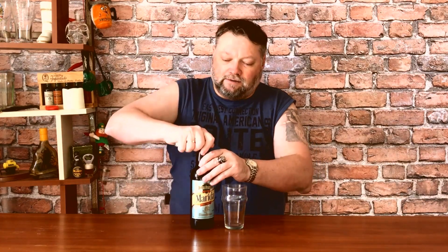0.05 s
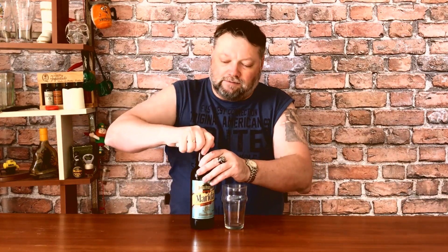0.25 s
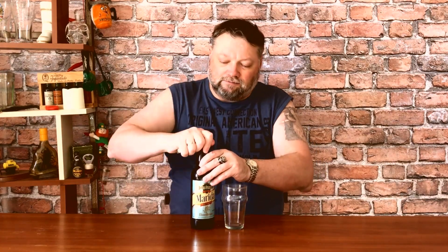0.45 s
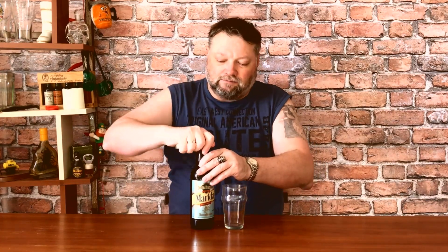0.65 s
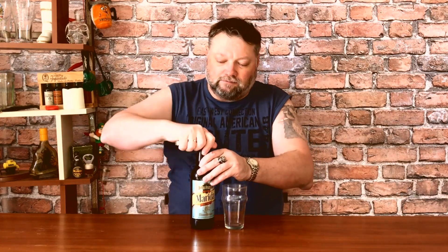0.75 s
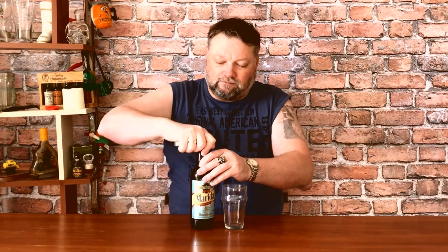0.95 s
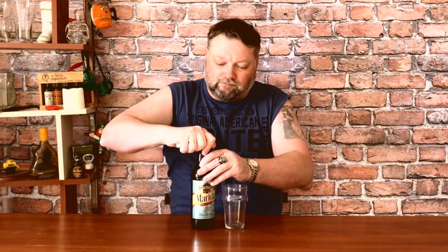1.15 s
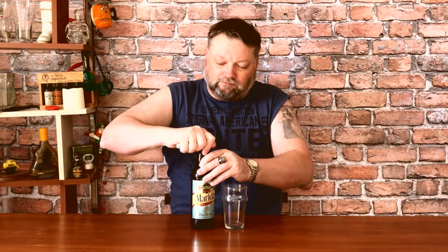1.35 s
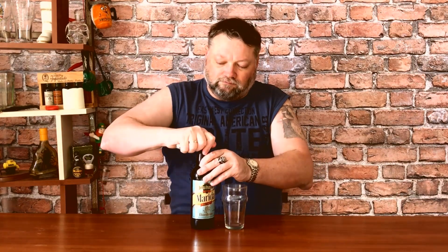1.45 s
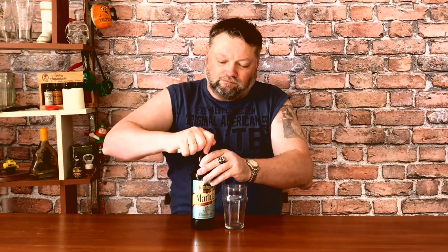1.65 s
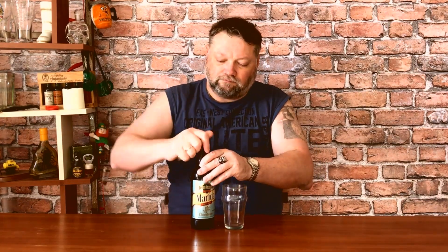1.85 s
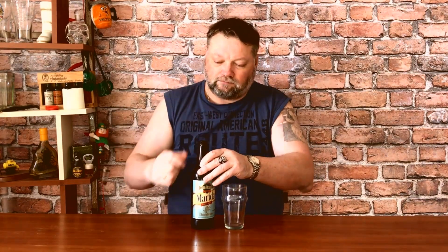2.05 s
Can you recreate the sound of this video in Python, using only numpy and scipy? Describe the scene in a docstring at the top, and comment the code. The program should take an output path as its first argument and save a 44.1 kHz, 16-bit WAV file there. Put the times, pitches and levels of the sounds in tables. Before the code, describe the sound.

A glass bottle is opened with a brief hiss, a sharp pop and small clinks.

```python
"""Opening a glass bottle

A crown cap is levered off a bottle on a wooden table, in a quiet, hard-walled room. Gas jets hissing
under the rim, the seal pops and overloads the microphone, the hand shifts, and the opener knocks.
A last puff escapes, the bottle bumps and judders, and the cap ticks, scrapes free and chimes.
Each impact is a filtered pulse of force; bottle, cap and table ring on in their damped modes."""
import sys
import numpy as np
from scipy import signal
from scipy.fft import rfft, irfft
from scipy.io import wavfile
from scipy.ndimage import uniform_filter1d

SR = 44100
rng = np.random.default_rng(int(sys.argv[2]) if len(sys.argv) > 2 else 0)


def inscribe(sig):
    """Save sig as 16-bit PCM at rate SR to the path in sys.argv[1].

    A 1-D sig is mono; a 2-D sig holds one channel per row.
    Samples are clipped to [-1, 1] before scaling.
    """
    pcm = np.round(np.clip(np.atleast_2d(sig).T, -1, 1) * 32767)
    wavfile.write(sys.argv[1], SR, pcm.astype(np.int16))


N = 92610


def amp(db):
    """Amplitude ratio of a level in decibels."""
    return 10 ** (np.asarray(db) / 20)


def unit(x):
    """Normalisation to an rms of 1."""
    return x / np.sqrt(np.mean(x ** 2) + 1e-20)


def read(table, hz, column=1):
    """Interpolation of a table on a logarithmic frequency axis."""
    table = np.array(table)
    return np.interp(np.log(hz + 1), np.log(table[:, 0] + 1), table[:, column])


def add(mix, start_s, sound):
    """Superposition of a delayed sound on the mix."""
    part = mix[round(start_s * SR):][:len(sound)]
    part += sound[:len(part)]


def flatten(x, bins):
    """Whitening: the spectrum is divided by its local rms."""
    z = rfft(x)
    return irfft(z / np.sqrt(abs(uniform_filter1d(abs(z) ** 2, bins)) + 1e-12), len(x))


def noise(spectrum):
    """Stationary filtered noise of rms 1."""
    gain = amp(read(spectrum, np.fft.rfftfreq(N, 1 / SR)))
    return unit(irfft(rfft(rng.standard_normal(N)) * gain, N))


def flutter(depth_db, samples):
    """Random amplitude modulation: a gain whose level follows smoothed noise."""
    return amp(depth_db * unit(uniform_filter1d(rng.standard_normal(N), samples)))


def click(spectrum, size=8192):
    """Minimum-phase pulse of unit energy with the given spectrum."""
    level_db = np.maximum(read(spectrum, abs(np.fft.fftfreq(size, 1 / SR))), -90)
    log_response = np.conj(signal.hilbert(np.log(amp(level_db))))
    pulse = np.fft.ifft(np.exp(log_response)).real[:size // 2]
    return pulse / np.linalg.norm(pulse)


def impacts(events, spectrum, clean_contact_s=0.003, size=4096):
    """Convolution of force and click: short contacts stay clean, long ones break into a dying scatter."""
    pulse, out = click(spectrum), np.zeros(N)
    for start, db, contact_s in events:
        scatter = rng.standard_normal(size) * np.exp(-np.arange(size) / SR / contact_s)
        scatter = flatten(scatter, bins=12)[:size // 2]
        share = contact_s ** 2 / (contact_s ** 2 + clean_contact_s ** 2)
        force = np.sqrt(share) * scatter / np.linalg.norm(scatter)
        force[0] += np.sqrt(1 - share)
        add(out, start, amp(db) * signal.fftconvolve(force, pulse))
    return out


def ring(events, modes, rise_s, diffuse=0.62, waver_s=0.035):
    """Free vibration: each event starts damped modes, which waver as the room scatters them."""
    t, out = np.arange(SR) / SR, np.zeros(N)
    window = np.hanning(round(2 * waver_s * SR))
    for start, db, *_ in events:
        for hz, mode_db, t60 in modes:
            white = rng.standard_normal(SR) + 1j * rng.standard_normal(SR)
            drift = signal.fftconvolve(white, window, "same")
            waver = np.sqrt(1 - diffuse ** 2) + diffuse * drift / drift.std()
            tone = (waver * np.exp(2j * np.pi * (hz * t + rng.random()))).real
            envelope = (1 - np.exp(-t / rise_s)) * np.exp(-np.log(1000) * t / t60)
            add(out, start, amp(db + mode_db) * envelope * tone)
    return out


def gap_whistles(flutter_s=0.014):
    """Narrow-band noise: thin whistles of the gap under the cap flare and fade independently."""
    # whistle bands (f/Hz, width/Hz, level re jet/dB)
    bands = [(8300, 120, -12), (8750, 250, -11), (9600, 160, -14)]
    hz, out = np.fft.rfftfreq(N, 1 / SR), np.zeros(N)
    for centre, width, db in bands:
        band = irfft(rfft(rng.standard_normal(N)) * np.exp(-((hz - centre) / width) ** 2), N)
        out += amp(db) * unit(band * flutter(depth_db=3.5, samples=round(flutter_s * SR)))
    return out


def gas_hiss(split_hz=6000, low_lag_s=0.0055, top_hz=13000):
    """Jet noise: gas escapes under the cap, thin at first, then full as the lower band comes in."""
    # leaks (start t/s, rise/s, held until t/s, release/s, level/dB)
    leaks = [(0.099, 0.048, 0.28, 0.11, -24.5), (1.068, 0.03, 1.132, 0.027, -50)]
    # jet spectrum (f/Hz, level/dB)
    spectrum = [(240, -45), (721, -33.5), (1380, -23.5), (1700, -16.5), (1950, -6), (2600, -9),
                (2960, -1.5), (3700, -8.5), (4220, -6.5), (6200, -5), (7800, -7), (8430, -2.5), (10500, -6),
                (11300, -6.5), (12600, -15), (13500, -28.5)]
    t, out = np.arange(N) / SR, np.zeros(N)
    jet = noise(spectrum) + gap_whistles()
    low = signal.sosfiltfilt(signal.butter(2, split_hz, fs=SR, output="sos"), jet)
    for start, rise, until, release, db in leaks:
        closing = np.clip(1 - (t - until) / release, 0, 1)
        for band, lag in ((jet - low, 0), (low, low_lag_s)):
            opening = np.clip((t - start - lag) / rise, 0, 1)
            out += amp(db) * band * (opening * closing) ** 2
    out *= flutter(depth_db=1.1, samples=250)
    return signal.sosfilt(signal.butter(12, top_hz, fs=SR, output="sos"), out)


def seal_pop():
    """Sudden pressure release excites neck and cap. Returns the pop with an early echo, and ringing."""
    # the seal's crack and gas burst, then an early room echo of the pop
    # (t/s, energy level/dB, duration/s)
    pulses = [(0.3609, 24.5, 0.0024), (0.3632, 20, 0.01), (0.391, 14, .003)]
    # pop spectrum (f/Hz, level/dB)
    spectrum = [(76, -46), (130, -29), (233, -14.5), (315, -18), (380, -9), (650, -30), (830, -18.5),
                (1050, -11.5), (1160, -11.5), (1290, -1.5), (1480, -8), (1900, -6), (2300, -14),
                (2600, -9.5), (2880, -9), (3300, -17), (3550, -13), (4020, -21), (4400, -10), (4700, -17),
                (5200, -16.5), (5730, -9.5), (6150, -21), (9870, -15), (16000, -54.5)]
    # modes of neck and cap (f/Hz, level/dB, T60/s)
    modes = [(1072, -1, .3), (1252, 3.5, .43), (1307, 4.5, .41), (1388, -3, .45), (1631, -3, .4),
             (1846, -7, .45), (2640, -7, .43), (3489, -5, .4), (4462, -5, .34), (4829, -6, .37),
             (5640, -4, .38), (5739, -3.5, .42)]
    crack_s, ring_db = pulses[0][0], -20.5
    return impacts(pulses, spectrum), ring([(crack_s, ring_db)], modes, rise_s=0.00067)


def table_resonance():
    """Structure-borne sound: shoves pass through the bottle into the low modes of the table."""
    # shoves (t/s, level/dB)
    shoves = [(0.367, -33.5), (0.917, -45.5), (1.62, -47)]
    # modes of the table top (f/Hz, level/dB, T60/s)
    modes = [(57, 4, .55), (81, 4, .45), (165, -5, .6), (236, 3, .62), (272, -4, .5), (377, -8, .55)]
    return ring(shoves, modes, rise_s=0.018)


def grip_rub(centre_s=0.765, width_s=0.022, db=-47.5):
    """Friction noise: a soft swell of skin rubbing on glass as the hand shifts."""
    # rubbing spectrum (f/Hz, level/dB)
    spectrum = [(80, -8.5), (370, 4.5), (650, -12.5), (1000, -4), (2300, -8), (4000, -15), (10000, -46.5)]
    swell = np.exp(-((np.arange(N) / SR - centre_s) / width_s) ** 2)
    return amp(db) * noise(spectrum) * swell


def opener_knocks():
    """Impact excitation: the opener strikes the cap on a second pull. Returns knocks and ringing."""
    # knocks (t/s, energy level/dB, contact/s)
    knocks = [(0.9056, -12, 0.0038), (0.9139, 16.5, 0.00078)]
    # knock spectrum (f/Hz, level/dB)
    spectrum = [(65, -70), (110, -30), (228, -11.5), (297, -27.5), (403, -11), (617, -31), (1040, -22),
                (1200, -8), (1390, -9), (1570, -3), (2000, -6), (2710, -5), (3120, -20), (4590, -18.5),
                (5080, -21.5), (7940, -26), (11200, -31.5), (13200, -57.5), (14000, -83)]
    # modes of bottle and cap (f/Hz, level/dB, T60/s)
    modes = [(1251, -5.5, 0.45), (1307, -2, 0.28), (1560, 0.5, 0.4), (1580, -3, 0.42), (2200, -5, 0.37)]
    return impacts(knocks, spectrum), amp(-40.5) * ring(knocks, modes, rise_s=0.0026)


def rim_ticks():
    """Brief contacts have wide spectra: the opener ticks brightly on the rim of the cap."""
    # ticks (t/s, energy level/dB, contact/s)
    ticks = [(1.534, -33.5, 0.00093), (1.7315, -7, 0.00021), (1.7395, -21, 0.0012), (1.775, -12, 0.0013)]
    # tick spectrum (f/Hz, level/dB)
    spectrum = [(200, -22), (1500, -13.5), (2000, 1.5), (2350, -5.5), (3150, -5.5), (3700, 3.5), (4450, 1),
                (4850, -18), (9300, -22), (11000, -38), (15000, -62)]
    return impacts(ticks, spectrum)


def bottle_bumps():
    """Impact on a compliant surface: glass meets wood with a mostly low-pitched thud."""
    # bumps (t/s, energy level/dB, contact/s)
    bumps = [(1.6085, -12, 0.003), (1.614, -7, 0.0061)]
    # bump spectrum (f/Hz, level/dB)
    spectrum = [(65, -28.5), (110, -38), (244, 6), (411, -26), (492, -10), (748, -23), (1050, -15.5),
                (1840, -9.5), (2380, -17), (3150, -13), (5090, -33.5), (9830, -38), (13000, -52)]
    return impacts(bumps, spectrum)


def base_judder(start_s=1.7, length_s=0.18, first_hz=305, last_hz=237, db=-45.5):
    """Contact vibration: the base judders on the wood as it settles, a low groan of falling pitch."""
    progress = np.clip((np.arange(N) / SR - start_s) / length_s, 0, 1)
    cycles = np.cumsum(first_hz + (last_hz - first_hz) * progress) / SR
    envelope = np.sin(np.pi * np.sqrt(progress))
    return amp(db) * envelope * np.sin(2 * np.pi * (cycles + rng.random()))


def cap_scrape():
    """Sliding friction as a run of tiny impacts: the cap drags over the glass and comes free."""
    # scrapes (t/s, energy level/dB, contact/s)
    scrapes = [(1.8098, -2.5, 0.00074), (1.819, -11, 0.0016), (1.84, -13.5, 0.011)]
    # scrape spectrum (f/Hz, level/dB)
    spectrum = [(450, -9.5), (600, -4), (850, -15), (1550, -2), (2100, 1.5), (2300, -11), (2800, 8.5),
                (3300, -4.5), (3650, 7), (4000, -3.5), (6000, -6.5), (9400, -10.5), (14000, -34)]
    return impacts(scrapes, spectrum)


def cap_chime():
    """Inharmonic modes: the loose cap chimes against the opener. Returns clinks and ringing."""
    # clinks (t/s, energy level/dB, contact/s)
    clinks = [(1.8974, -13.5, 0.00091), (2.084, -27.5, 0.0026)]
    # clink spectrum (f/Hz, level/dB)
    spectrum = [(800, -30), (1200, -6), (1900, -8), (2300, 8), (3350, -15), (4600, 1.5), (5300, -12),
                (9500, -15.5), (13000, -48)]
    # modes of the loose cap (f/Hz, level/dB, T60/s)
    modes = [(2309, -3.5, .36), (3812, -7.5, .42), (4748, -4.5, .6), (8400, -13, .3), (8470, -6, .13)]
    return impacts(clinks, spectrum), amp(-34) * ring(clinks, modes, rise_s=0.00092)


def diffuse_noise(size=2048, passes=3):
    """Short-time whitening: one second of noise in which no pitch stands out for long."""
    x = rng.standard_normal(SR)
    for _ in range(passes):
        z = signal.stft(x, nperseg=size)[2]
        local_rms = np.sqrt(uniform_filter1d(abs(z) ** 2, size=5, axis=0))
        x = signal.istft(z / local_rms, nperseg=size)[1][:SR]
    return unit(x)


def room(x, first_echo_s=0.0012, early_db=3, early_s=0.045):
    """Reverberation: direct sound, then dense reflections that die faster in the treble."""
    # reverberant field (f/Hz, T60/s, level re direct sound/dB)
    reverb = [(60, 0.6, 17.5), (238, 0.45, 4.5), (556, 0.59, 10), (1400, 0.47, 8.5), (2950, 0.45, 5),
              (6100, 0.43, 9), (9100, 0.34, 3.5), (15040, .3, 0)]
    t = np.arange(SR) / SR
    hz, frame_s, z = signal.stft(diffuse_noise(), SR, nperseg=256)
    decay = np.exp(-np.log(1000) * frame_s / read(reverb, hz)[:, None])
    tail = signal.istft(z * decay, SR, nperseg=256)[1][:SR]
    tail = flatten(tail * amp(early_db * np.exp(-t / early_s)), bins=70)
    tail = irfft(rfft(tail) * amp(read(reverb, np.fft.rfftfreq(SR, 1 / SR), column=2)))
    response = (tail * np.clip(t / first_echo_s - 1, 0, 1))[:SR * 3 // 4]
    response[0] += 1  # direct path
    return amp(-9.3) * signal.fftconvolve(x, response)[:N]


def scene():
    """Superposition of the reverberated sources, the lingering modes and a quiet background."""
    # background spectrum (f/Hz, level/dB)
    background = [(20, -24.5), (57, 3.5), (75, -3), (151, -7), (300, -13), (409, -14), (497, -21),
                  (733, -19.5), (865, -18), (2040, -21.5), (10800, -28), (15000, -56.5)]
    gas = gas_hiss()
    pop, neck_ring = seal_pop()
    knocks, knock_ring = opener_knocks()
    clinks, cap_ring = cap_chime()
    sources = gas + pop + grip_rub() + knocks + rim_ticks()
    sources += bottle_bumps() + base_judder() + cap_scrape() + clinks
    ringing = neck_ring + table_resonance() + knock_ring + cap_ring
    return (room(sources) + ringing + amp(-61.5) * noise(background))[None]


def record(dry, overload=0.74, edge_hz=16400):
    """Saturation: the microphone rounds off the peaks of the pop; a low-pass then limits the band."""
    soft = dry / (1 + (dry / overload) ** 8) ** (1 / 8)
    lowpass = signal.firwin(511, edge_hz, window=("kaiser", 9), fs=SR)
    return signal.oaconvolve(soft, lowpass[None], "same")


dry = scene()
out = record(dry)
inscribe(out)
```